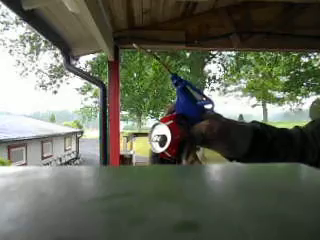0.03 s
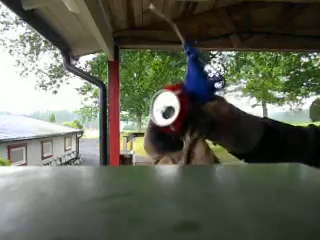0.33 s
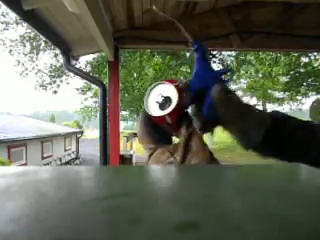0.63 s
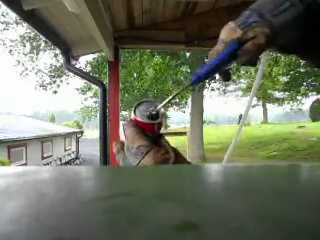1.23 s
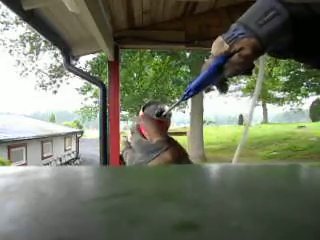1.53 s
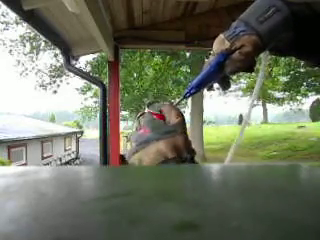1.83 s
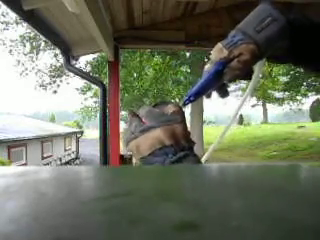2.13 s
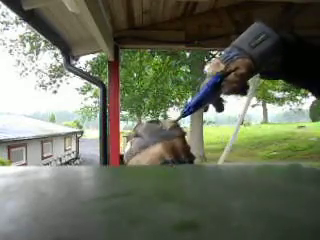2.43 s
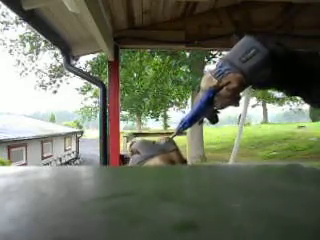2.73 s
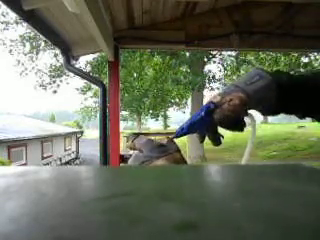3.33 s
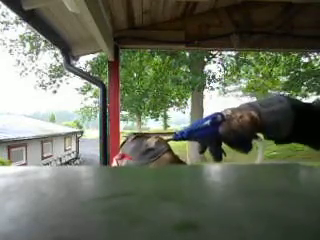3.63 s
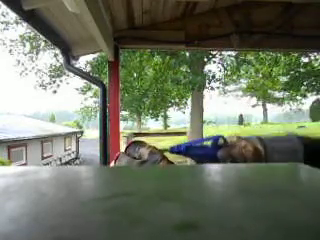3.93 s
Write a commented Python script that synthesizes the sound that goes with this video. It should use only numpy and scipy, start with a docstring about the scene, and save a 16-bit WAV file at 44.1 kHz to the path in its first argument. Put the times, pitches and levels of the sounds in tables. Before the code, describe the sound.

A metal nozzle knocks and scrapes against an aluminium can over a steady outdoor rush.

```python
"""Gloved hands work the long metal nozzle of a hand tool into an aluminium can under an open shelter.
First come soft handling thumps and faint high chirps over a steady outdoor rush. After a second the
nozzle starts to knock and scrape, ringing the thin wall; the grip damps it and shifts its two main
resonances. The rush dips at each loud contact and swells back. At 2.5 s a slide makes a rising squeak,
and more knocks and scrapes follow, all with a short echo from the roof."""
import sys
import numpy as np
from scipy import signal
from scipy.fft import rfft, irfft
from scipy.io import wavfile
from scipy.ndimage import uniform_filter1d

SR = 44100
rng = np.random.default_rng(int(sys.argv[2]) if len(sys.argv) > 2 else 0)


def waveform_to_disk(signal):
    """Save audio, clipped to [-1, 1], as 16-bit WAV at the path in sys.argv[1]."""
    frames = np.transpose(np.atleast_2d(signal))
    scaled = np.clip(frames, -1, 1) * 32767
    samples = np.round(scaled).astype(np.int16)
    wavfile.write(sys.argv[1], SR, samples)


N = 176400
T = np.arange(N) / SR
CONTACT_T = T[:16384]   # time within one contact, in seconds

# the can's modes, the tones it rings at; t60 is the time to fade by 60 dB [f/Hz, level/dB, t60/s]
CAN_MODES = [(300, -2.5, 0.044), (447, -0.5, 0.052), (538, -2.5, 0.048), (663, -6.5, 0.091),
             (792, 0, 0.046), (988, 9, 0.025), (1294, 0.5, 0.043), (1398, 0, 0.039), (1657, -3, 0.066),
             (1722, 8.5, 0.017), (1850, -3, 0.049), (1990, 5, 0.05), (2245, 1.5, 0.041), (2535, 4.5, 0.055),
             (2690, -4, 0.052), (3000, 1, 0.072)]
# the thin wall's high, tinny modes [f/Hz, level/dB, t60/s]
TINNY_MODES = [(3550, -7, 0.017), (4035, 0.5, 0.037), (4420, -3.5, 0.022), (4650, -3, 0.051),
               (5050, -1, 0.021), (6980, 1, 0.025), (7500, -1, 0.023), (8640, 0.5, 0.024),
               (9620, 0.5, 0.021), (9890, 4.5, 0.01), (10260, 3.5, 0.051), (11460, -1, 0.022)]
# the nozzle hits the can [t/s, chatter/s, wall f/Hz, wall level/dB, rim f/Hz, rim level/dB,
# body level/dB, clank level/dB, hiss level/dB]
KNOCKS = [(1.067, 0.0095, 913, -36, 1300, -42, -38, -56, -74),
          (1.095, 0.0095, 910, -35.5, 1490, -48, -49, -74, -70),
          (1.3195, 0.002, 944, -34, 2324, -31.5, -30, -33, -33),
          (1.4088, 0.0064, 910, -49, 3160, -67, -51, -52, -39.5),
          (1.4331, 0.0055, 870, -49, 3130, -52, -33, -38, -40),
          (1.5077, .006, 830, -63, 3100, -48, -43, -45, -40),
          (1.5213, 0.0034, 824, -32.5, 3410, -37, -36, -36.5, -38),
          (1.6658, 0.0069, 720, -33.5, 1066, -31.5, -58, -29, -33.5),
          (1.7131, 0.01, 1218, -35, 2240, -47.5, -49, -43, -38),
          (1.9881, 0.018, 1050, -19, 1720, -25.5, -13.5, -15, -25),
          (2.387, 0.0091, 1140, -41.5, 1530, -53, -43, -51.5, -60),
          (2.593, 0.0025, 2740, -32.5, 4850, -44, -47.5, -39.5, -37.5),
          (2.901, 0.015, 1063, -17.5, 634, -19, -20.5, -30, -33),
          (2.986, 0.0073, 950, -57, 1280, -53, -37.5, -51, -82),
          (3.015, .006, 380, -49, 1020, -56, -48, -65, -85),
          (3.055, 0.018, 1100, -42, 2020, -39, -63, -38.5, -38),
          (3.129, 0.0046, 990, -47.5, 1270, -50, -44, -45, -57),
          (3.268, 0.0084, 1080, -52, 1420, -58, -60, -55, -74),
          (3.294, 0.004, 1100, -45, 1970, -37.5, -56, -44, -48),
          (3.438, 0.0069, 1005, -46, 1490, -60, -53, -54, -85),
          (3.578, .008, 807, -51, 1150, -57, -43, -51, -76),
          (3.8592, 0.0078, 1056, -22.5, 2810, -33.5, -24, -25.5, -27.5)]
# the nozzle rubs the can [t/s, rise/s, hold/s, then the same last seven columns as KNOCKS]
SCRAPES = [(1.325, 0.0067, 0.004, 980, -24.5, 3150, -38.5, -34, -29.5, -27),
           (1.354, 0.009, 0.0067, 424, -32.5, 940, -59, -39.5, -60, -42.5),
           (1.374, 0.046, 0.095, 868, -40.5, 3140, -46.5, -49, -45, -43.5),
           (1.436, 0.023, 0.021, 1165, -49, 2240, -38, -39.5, -45, -43),
           (1.473, 0.0029, .003, 1176, -36.5, 4030, -40, -34.5, -35, -39),
           (1.560, 0.047, 0.022, 800, -69, 2950, -60, -47, -50.5, -69),
           (1.898, 0.072, 0.086, 1100, -47.5, 2870, -51, -39.5, -43, -55),
           (2.440, 0.087, 0.0055, 537, -44, 2200, -44, -41, -34.5, -48),
           (2.534, 0.031, 0.019, 1170, -42, 2430, -36, -37, -28.5, -30),
           (2.814, 0.014, 0.052, 950, -51, 1500, -54, -43.5, -52, -74),
           (3.055, .014, .020, 1300, -36, 2686, -31, -45.5, -33.5, -31),
           (3.215, 0.069, 0.0089, 1050, -45, 2760, -56, -46, -46.5, -65),
           (3.300, 0.0026, 0.0065, 1200, -57, 2853, -29.5, -42, -35.5, -32.5),
           (3.576, 0.027, 0.048, 1220, -43, 1910, -47, -37.5, -41, -62),
           (3.656, 0.014, 0.019, 1154, -33.5, 1850, -52, -35, -47, -71),
           (3.700, 0.0059, 0.024, 1080, -37, 2300, -54, -41, -55, -76),
           (3.763, 0.018, 0.0038, 1083, -26, 1890, -42.5, -31.5, -63, -74),
           (3.864, 0.003, 0.0083, 1266, -34.5, 2800, -37, -42, -39, -33)]
# tone colour of the low, middle and high parts of a contact [f/Hz, level/dB]
BODY_COLOUR = [(40, -29), (120, -10.5), (280, -11.5), (500, -10.5), (850, -6), (1150, -9.5), (1600, -24.5),
               (4000, -66)]
CLANK_COLOUR = [(300, -8.5), (800, 1.5), (1250, 14), (1800, 0), (2400, 4), (2900, 8.5), (3500, -5.5),
                (4500, 3), (6500, -69), (12000, -51)]
HISS_COLOUR = [(1500, -23), (3000, 10.5), (4200, 5.5), (5000, 0), (6000, 3), (7300, 3.5), (8500, 7),
               (9800, 7), (10700, 8.5), (12000, -7)]
# path of the rising squeak [t/s, f/Hz, level/dB]
SQUEAK_PATH = [(2.50, 453.4, -41.5), (2.53, 594.7, -30), (2.552, 1372, -29), (2.57, 2045, -27.5),
               (2.587, 2446, -32), (2.595, 2694, -34), (2.61, 2920, -56)]
# tone colour of the shelter's echo [f/Hz, level/dB]
ECHO_COLOUR = [(60, -15), (300, -6), (800, 1.5), (1500, -4.5), (3000, -4), (5000, -2.5), (10000, -8)]
# soft low thumps: handling bumps early on, and the can's low thud under the last knock
# [t/s, f/Hz, peak level/dB]
THUMPS = [(.503, 70, -16), (.675, 94, -24), (.745, 111, -22), (1.058, 113, -9.5), (1.112, 231, -13.5),
          (1.209, 162, -19.5), (3.864, 300, -26.5)]
# faint high chirps [t/s, swell time/s, f/Hz, level/dB]
CHIRPS = [(0.234, 0.032, 3420, -52), (0.709, .012, 4500, -51.5), (0.72, 0.026, 9200, -50.5),
          (0.923, 0.01, 3200, -53), (1.017, .02, 3210, -56), (3.82, 0.016, 3300, -54)]
# loudness of the handling rumble [t/s, level/dB]
RUMBLE_LEVELS = [(0, -41), (.3, -44), (.6, -39), (.7, -40), (.79, -49), (.88, -34), (1.0, -35.5),
                 (1.2, -35), (1.31, -39), (1.5, -38), (2.5, -47.5), (3.4, -46.5), (3.7, -60), (4, -57)]
# tone colour of the handling rumble and of the outdoor rush [f/Hz, level/dB]
RUMBLE_COLOUR = [(12, -25), (30, -14), (45, -13.5), (70, 0.5), (130, -5.5), (250, -11.5), (600, -45.5),
                 (2000, -94)]
RUSH_COLOUR = [(20, 11), (100, -7), (250, -1), (500, 0), (750, 0.5), (1000, -3.5), (1500, -13), (2000, -18),
               (3200, -23), (4200, -29), (6000, -34), (7500, -33.5), (10000, -24.5), (11000, -24),
               (12000, -46)]
# a low hum and a high whine in the background [f/Hz, width/Hz, level/dB]
HUMS = [(76.7, 2.7, -41), (7780, 150, -67)]
# sudden dips of the background [t/s, depth/dB]
DIPS = [(1.314, 23), (1.521, 24), (1.663, 31), (1.984, 25), (2.562, 24), (2.896, 20), (3.048, 23),
        (3.297, 22), (3.67, 6.5), (3.775, 5), (3.855, 20)]
# holes in the microphone's treble [f/Hz, width/Hz]
NOTCHES = [(5512, 3540), (11025, 1040)]

KNOCK_S = 0.028   # a knock's level counts as an average over this time
CHATTER, CHATTER_ON_RINGS = 2.2, 0.72   # strength of the chatter against the first blow
SCRAPE_RELEASE_S, GRAIN_DB = 0.0095, 4   # how fast a scrape stops; how uneven its slips are
DIRECT_DB, TINNY_DB = -5, -5   # contact noise against the can's modes; tinny modes against that noise
WALL_T60_S, RIM_T60_S, RING_BUILD_S = 0.045, 0.03, 0.0041
GLOVE_T60_S = 0.09   # the glove's damping, added to each mode's own
MODE_SPREAD_DB, GRIP_SHIFT = 3.5, 0.011   # a mode's change from touch to touch: level, share of pitch
ECHO_DB, ECHO_T60_S, ECHO_BUILD_S = -14.5, 0.33, 0.011
RUSH_DB, RECOVER_DB_PER_S = -34, 44.5
PEAK_LIMIT, CUTOFF_HZ = 0.8, 12834


def knocks():
    """Each knock is a sharp blow on the can and a few milliseconds of chatter."""
    out = np.zeros(N)
    blow = 1.0 * (CONTACT_T == 0)
    for start, chatter_s, *voice in KNOCKS:
        chatter = unit(micro_slips() * np.exp(-(CONTACT_T / chatter_s) ** 3))   # the cube ends it fast
        sound = can(blow + CHATTER * chatter, blow + CHATTER_ON_RINGS * chatter, *voice)
        add(out, start, np.sqrt(KNOCK_S * SR) * sound)
    return out


def scrapes():
    """Each scrape is a run of tiny slips that swells, holds and stops."""
    out = np.zeros(N)
    for start, rise_s, hold_s, *voice in SCRAPES:
        release = np.exp(-np.maximum(CONTACT_T - rise_s - hold_s, 0) / SCRAPE_RELEASE_S)
        pressure = np.minimum(CONTACT_T / rise_s, 1) * release
        force = micro_slips() * pressure
        sounding_samples = np.sum(pressure ** 2) + WALL_T60_S * SR / 10
        add(out, start, np.sqrt(sounding_samples) * can(force, force, *voice))
    return out


def micro_slips():
    """Metal slips on metal in tiny, uneven jerks: noise whose level jumps every 32 samples."""
    slips = rng.standard_normal(len(CONTACT_T))
    jumps = np.repeat(rng.standard_normal(len(CONTACT_T) // 32), 32)
    return slips * from_db(GRAIN_DB * jumps)


def can(force, ring_force, wall_hz, wall_db, rim_hz, rim_db, body_db, clank_db, hiss_db):
    """The can answers a push with its modes and two main resonances that move with the grip."""
    shell = gripped_modes(force, CAN_MODES) + from_db(DIRECT_DB) * unit(force)
    tinny = from_db(TINNY_DB) * gripped_modes(force, TINNY_MODES) + unit(force)
    wall = from_db(wall_db) * swelling_ring(ring_force, wall_hz, WALL_T60_S)
    rim = from_db(rim_db) * swelling_ring(ring_force, rim_hz, RIM_T60_S)
    body = from_db(body_db) * unit(coloured(shell, BODY_COLOUR))
    clank = from_db(clank_db) * unit(coloured(shell, CLANK_COLOUR))
    hiss = from_db(hiss_db) * unit(coloured(tinny, HISS_COLOUR))
    return wall + rim + body + clank + hiss


def gripped_modes(force, modes):
    """Each touch rings every mode with a new strength and sign; the grip damps and detunes it a bit."""
    out = 0
    for hz, db, t60 in modes:
        strength, detune, sign = rng.standard_normal(3)
        gain = np.sign(sign) * from_db(db + MODE_SPREAD_DB * strength)
        damped_t60 = 1 / (1 / t60 + 1 / GLOVE_T60_S)
        out = out + gain * unit(ring(force, hz * (1 + GRIP_SHIFT * detune), damped_t60))
    return unit(out)


def swelling_ring(force, hz, t60):
    """The wall takes a moment to pick up the motion, so its ring swells before it fades."""
    return unit(ring(ring(force, hz, RING_BUILD_S), hz, t60))


def squeak():
    """Friction drives a rough squeak that climbs as the nozzle runs along the can."""
    times, hz, db = np.transpose(SQUEAK_PATH)
    out, t = np.zeros(N), times[0] + CONTACT_T
    pitch = np.interp(t, times, hz)
    tone = narrow_noise(pitch, width_hz=330)
    octave = from_db(-24) * narrow_noise(2 * pitch, width_hz=330)
    roughness = from_db(-2.5) * narrow_noise(pitch, width_hz=1100)
    loudness = from_db(np.interp(t, times, db, right=-120))
    add(out, times[0], (tone + octave + roughness) * loudness)
    return out


def shelter_echo(x):
    """The roof and posts scatter the sound into a short, smooth echo."""
    t = T[:SR]
    tail = rng.standard_normal(SR) * np.exp(-np.log(1000) * t / ECHO_T60_S)
    tail *= 1 - np.exp(-t / ECHO_BUILD_S)
    return from_db(ECHO_DB) * signal.fftconvolve(x, coloured(unit(tail), ECHO_COLOUR))[:N]


def thumps():
    """Each low thump is one soft push with a rebound."""
    return sum(from_db(db) * np.cos(2 * np.pi * hz * (T - t)) * np.exp(-((T - t) * hz / 0.32) ** 2)
               for t, hz, db in THUMPS)


def chirps():
    """Each chirp is a short swell of high, narrow noise."""
    return sum(from_db(db) * np.exp(-((T - t) / swell_s) ** 2) * narrow_noise(np.full(N, hz), 530)
               for t, swell_s, hz, db in CHIRPS)


def background():
    """Outdoor rush, handling rumble and hums dip at the loud contacts and swell back."""
    rush = from_db(RUSH_DB) * noise(RUSH_COLOUR)
    rumble = from_db(np.interp(T, *np.transpose(RUMBLE_LEVELS))) * noise(RUMBLE_COLOUR)
    bed = rush + rumble
    for hz, width_hz, db in HUMS:
        hum = ring(rng.standard_normal(N), hz, t60=np.log(1000) / np.pi / width_hz)
        bed += from_db(db) * np.sqrt(N) * unit(hum)
    dips_db = [(T >= t) * np.maximum(depth_db - RECOVER_DB_PER_S * (T - t), 0) for t, depth_db in DIPS]
    return bed * from_db(-uniform_filter1d(np.max(dips_db, axis=0), size=128))


def noise(colour):
    """Noise with a given tone colour and an average (rms) size of 1."""
    return unit(coloured(rng.standard_normal(N), colour)) * np.sqrt(N)


def narrow_noise(hz, width_hz):
    """A narrow band of noise, like an unsteady whistle, around a pitch that can move."""
    r = np.exp(-np.pi * width_hz / SR)
    jitter = rng.standard_normal(len(hz)) + 1j * rng.standard_normal(len(hz))
    wobble = signal.lfilter([1], [1, -2 * r, r * r], jitter)
    tone = np.exp(2j * np.pi * np.cumsum(hz) / SR)
    return np.sqrt(len(hz)) * unit(np.real(wobble * tone))


def ring(x, hz, t60):
    """A resonance: every push in x starts a fading tone."""
    r, w = np.exp(-np.log(1000) / (t60 * SR)), 2 * np.pi * hz / SR
    return signal.lfilter([1, 0, -1], [1, -2 * r * np.cos(w), r * r], x + 1e-18)


def coloured(x, colour):
    """Shape the lows and highs of a sound along [f/Hz, level/dB] points."""
    hz, db = np.transpose(colour)
    n = 2 * len(x)
    bin_hz = np.arange(n // 2 + 1) * SR / n
    gain = from_db(np.interp(np.log(bin_hz + 1), np.log(hz), db))
    cepstrum = irfft(np.log(gain))
    cepstrum[1:n // 2] *= 2   # fold it (minimum phase), so nothing sounds before its cause
    cepstrum[n // 2 + 1:] = 0
    return irfft(rfft(x, n) * np.exp(rfft(cepstrum)))[:len(x)]


def from_db(db):
    """Turn decibels into a gain."""
    return 10 ** (np.asarray(db) / 20)


def unit(x):
    """Scale a sound to an energy of 1."""
    return x / np.sqrt(np.sum(x ** 2) + 1e-20)


def add(out, start_s, x):
    """Mix a sound in at its start time."""
    i = int(start_s * SR)
    out[i:i + len(x)] += x[:N - i]


def scene():
    """Metal contacts and their echo, over thumps, chirps and the background."""
    metal = knocks() + scrapes() + squeak()
    return (metal + shelter_echo(metal) + thumps() + chirps() + background())[None]


def record(dry):
    """The microphone has two holes in its treble; peaks are rounded and the highest sounds are cut."""
    for hz, width_hz in NOTCHES:
        dry = signal.lfilter(*signal.iirnotch(hz, hz / width_hz, fs=SR), dry)
    rounded = PEAK_LIMIT * np.tanh(dry / PEAK_LIMIT)
    return signal.sosfilt(signal.cheby2(16, 60, CUTOFF_HZ, fs=SR, output="sos"), rounded)


dry = scene()
out = record(dry)
waveform_to_disk(out)
```